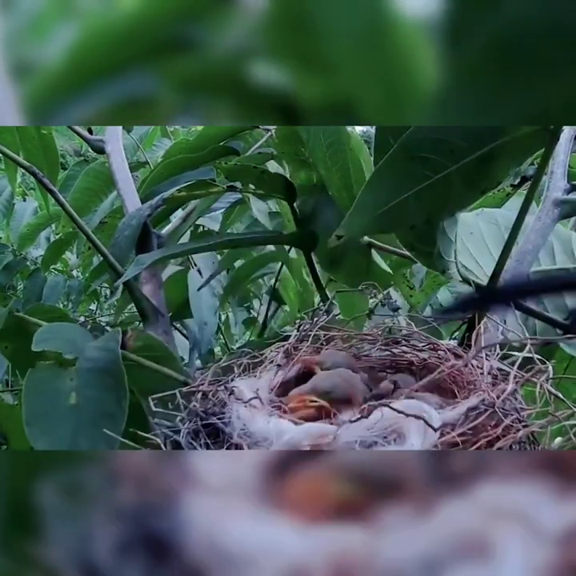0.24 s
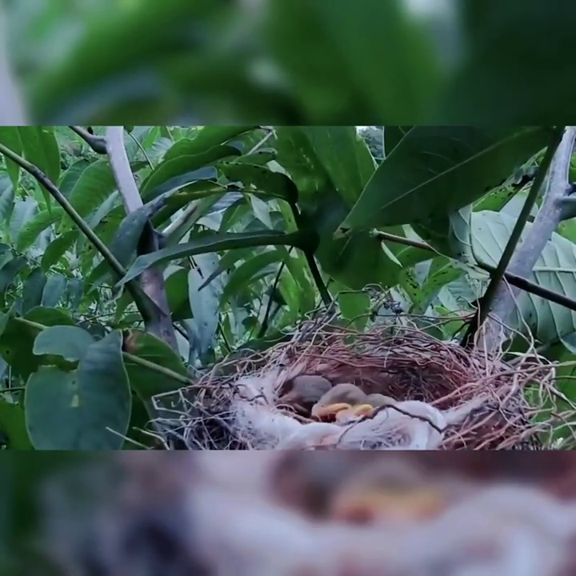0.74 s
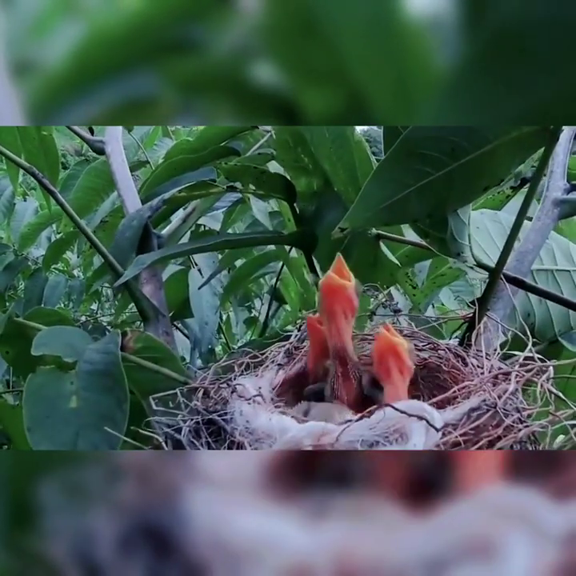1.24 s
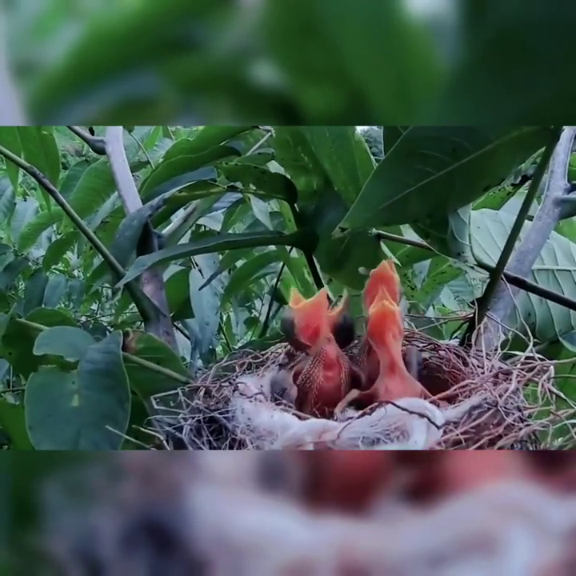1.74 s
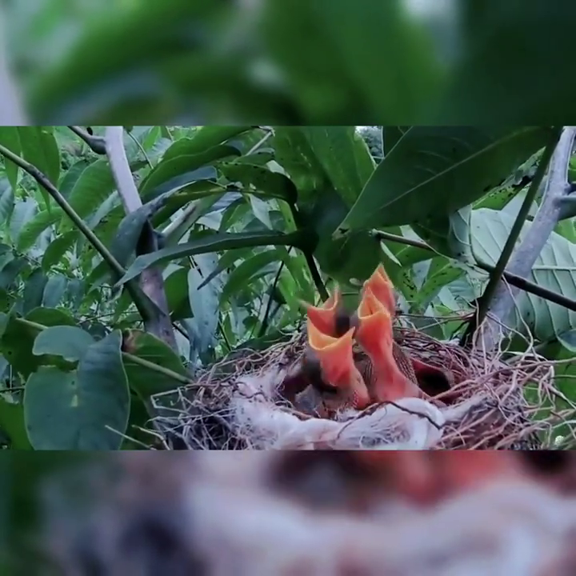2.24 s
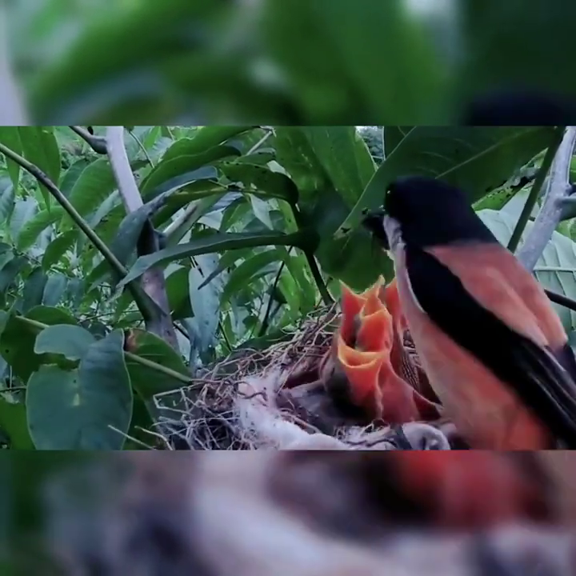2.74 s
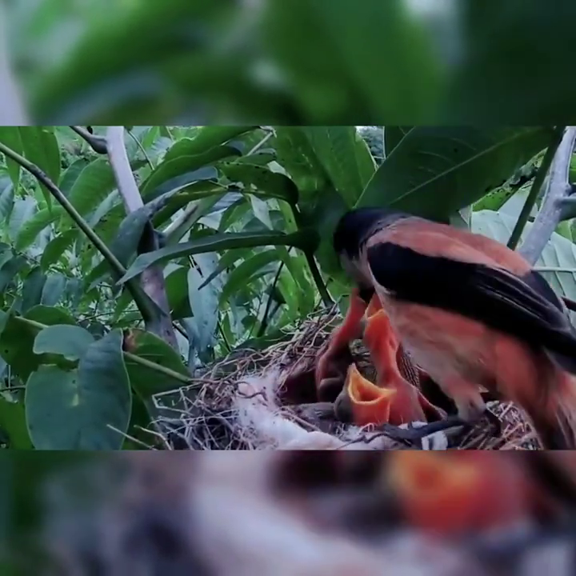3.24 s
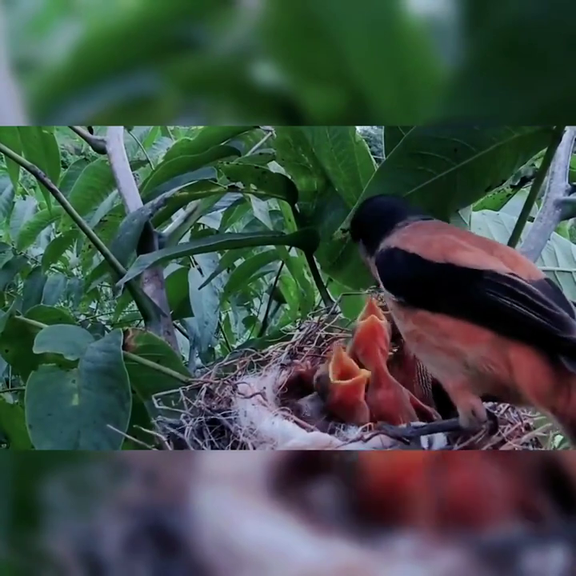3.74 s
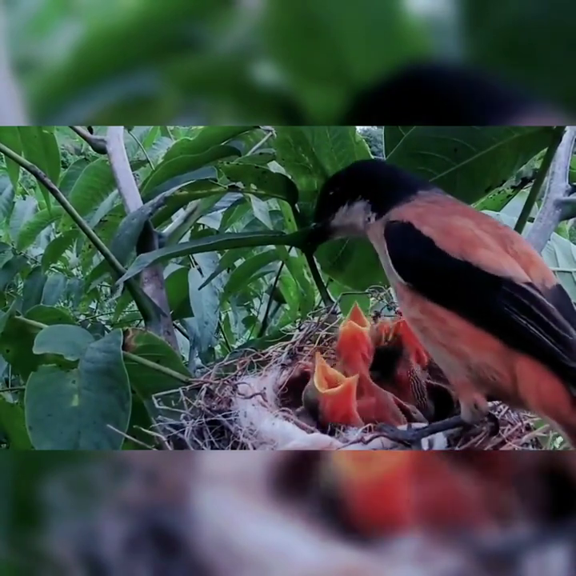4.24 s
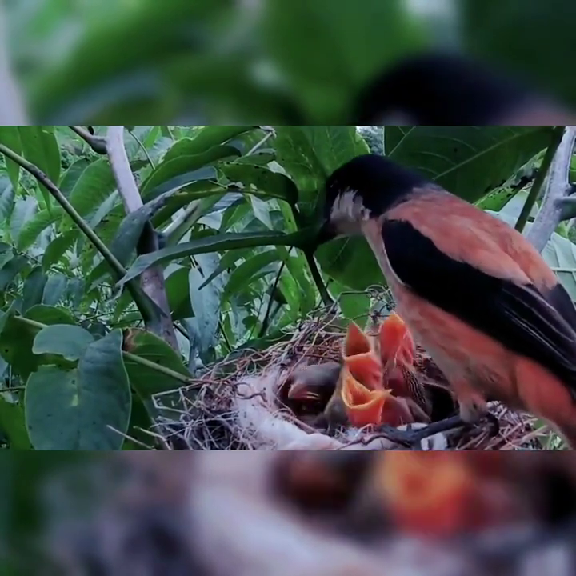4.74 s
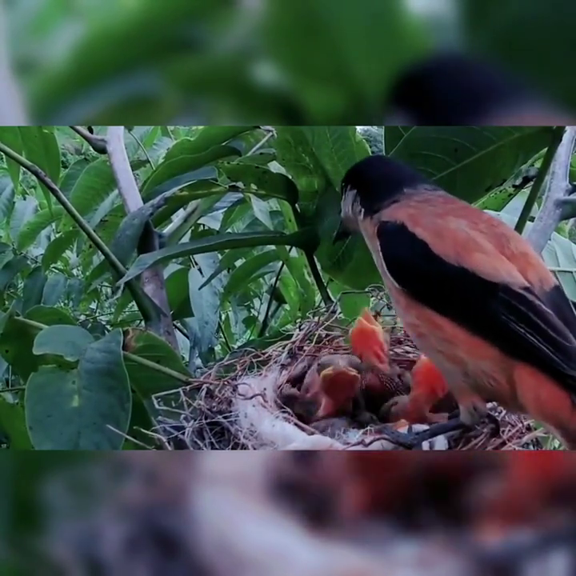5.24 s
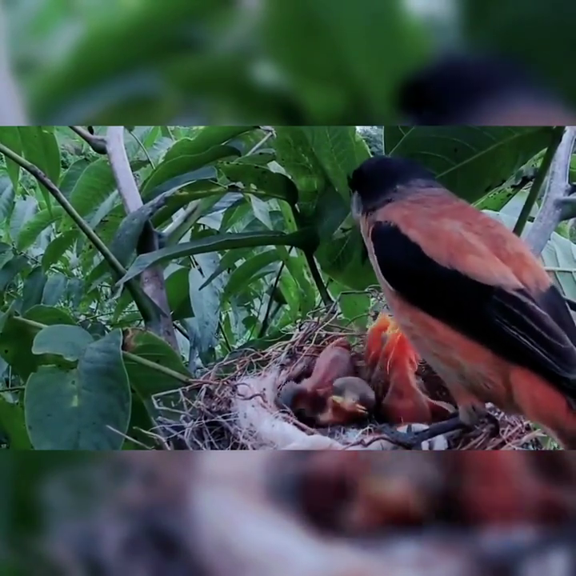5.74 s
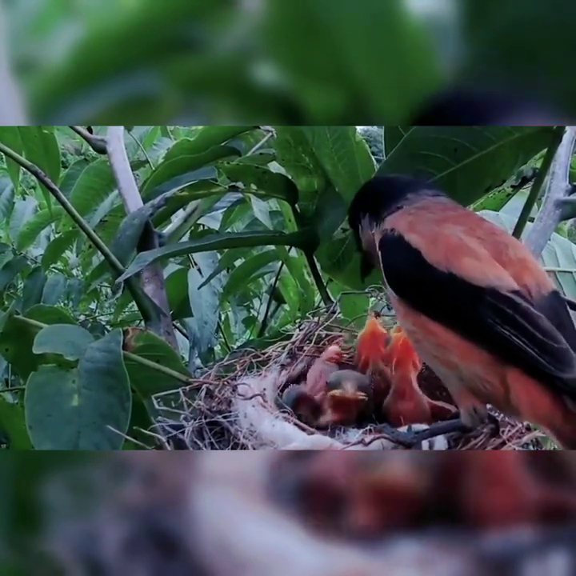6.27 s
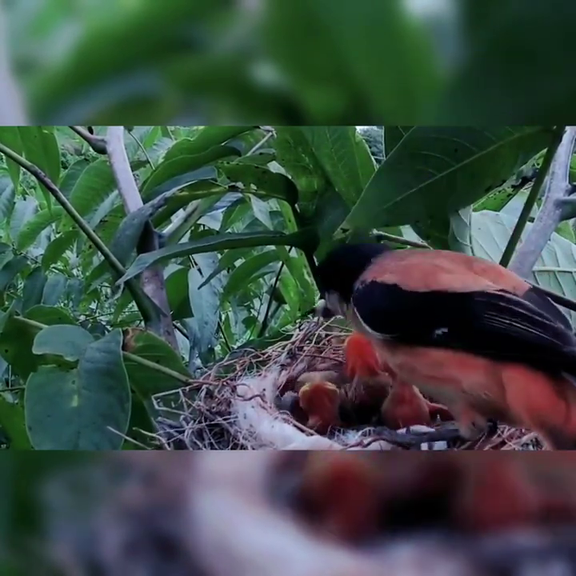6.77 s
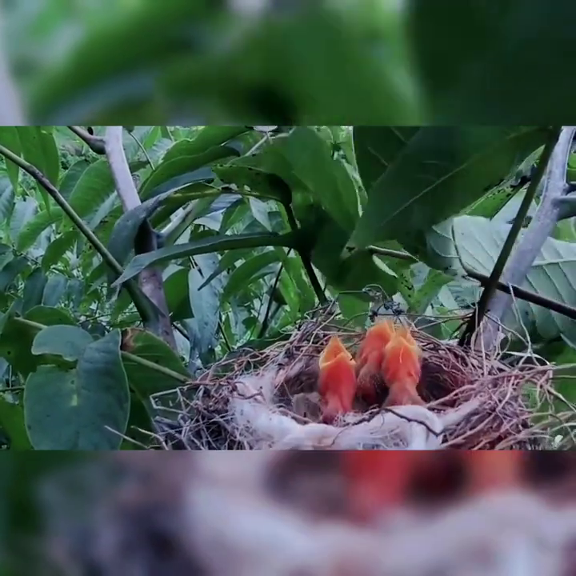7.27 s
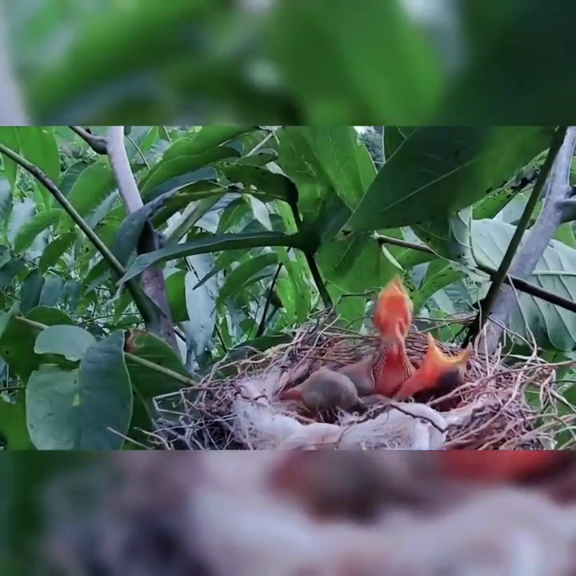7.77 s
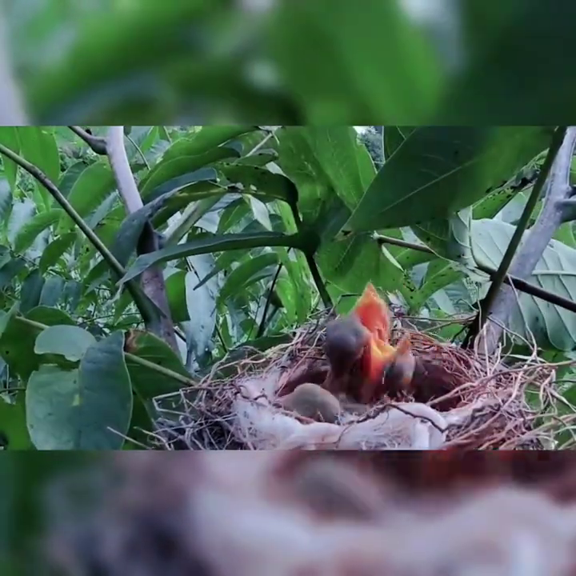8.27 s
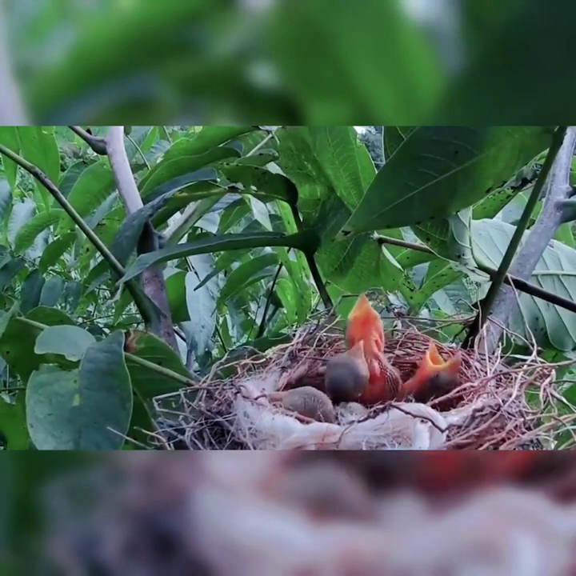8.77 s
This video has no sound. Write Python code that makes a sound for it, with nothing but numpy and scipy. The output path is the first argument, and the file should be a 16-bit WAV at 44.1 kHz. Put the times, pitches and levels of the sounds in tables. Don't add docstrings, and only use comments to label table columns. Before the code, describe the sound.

Four tiny birds beg with very high, short, unsteady whistles, mixed with lower chirps and squeaks. A parent clucks softly once or twice. Its landings and take-offs knock the wood, rattling the microphone mount and booming low, with gritty leaf and feather brushes. Behind lies an outdoor bed of soft hiss, insect droning and ticking, and faint rumble. Very close, dry, mono sound.

```python
import sys
import numpy as np
from scipy import signal
from scipy.fft import rfft, irfft
from scipy.io import wavfile
from scipy.ndimage import uniform_filter1d

SR = 44100
rng = np.random.default_rng(int(sys.argv[2]) if len(sys.argv) > 2 else 0)


def materialize(psi):
    bounded = np.clip(np.atleast_2d(psi).T, -1, 1)
    quanta = np.round(bounded * 32767).astype(np.int16)
    wavfile.write(sys.argv[1], SR, quanta)


def boost_factor(decibels):
    exponent = np.asarray(decibels, float) / 20
    return 10 ** exponent


N = 397341

# [top t/s, top f/Hz, length/s, level/dB]
SLIDER = [(0.013, 4580, 0.076, -41.5), (0.275, 5940, 0.059, -35), (0.557, 4200, 0.083, -36.5),
          (1.51, 6140, 0.072, -25), (1.572, 5010, 0.098, -39), (1.831, 7650, 0.053, -28.5),
          (2.094, 6820, 0.068, -26.5), (2.599, 7000, 0.037, -22), (2.826, 5960, 0.06, -24),
          (2.973, 5750, 0.11, -28.5), (3.043, 6880, 0.048, -27.5), (3.13, 6100, 0.097, -27.5),
          (3.133, 7150, 0.1, -33), (3.305, 7320, 0.17, -36.5), (3.356, 6740, 0.075, -30),
          (4.529, 7130, 0.069, -28), (4.937, 6170, 0.095, -29.5), (5.252, 6380, 0.04, -25),
          (5.433, 6740, 0.052, -29), (5.554, 7060, 0.084, -38), (5.628, 6350, 0.038, -28.5),
          (6.2, 6450, 0.085, -29.5), (6.423, 6370, 0.035, -25), (7.485, 6140, 0.023, -30.5),
          (7.701, 6600, 0.056, -23.5), (8.064, 5070, 0.064, -28), (8.446, 5420, 0.071, -28),
          (8.838, 7120, 0.1, -33.5), (8.828, 5240, 0.083, -30)]
# [top t/s, top f/Hz, length/s, level/dB]
LEANER = [(1.638, 5560, 0.056, -29.5), (2.347, 7450, 0.072, -32), (2.694, 5970, 0.067, -28),
          (2.731, 6970, 0.057, -29), (3.426, 6000, 0.031, -24.5), (3.648, 5490, 0.028, -26),
          (3.804, 6880, 0.043, -19.5), (3.841, 6800, 0.026, -29.5), (4.826, 6530, 0.063, -24),
          (5.151, 7470, 0.07, -36), (5.155, 6160, 0.084, -30), (5.567, 6180, 0.092, -32),
          (5.673, 5940, 0.032, -34), (5.75, 6530, 0.075, -32.5), (5.77, 7200, 0.054, -39),
          (5.835, 6400, 0.047, -21), (6.028, 6300, 0.031, -20.5), (6.319, 7630, 0.055, -34),
          (6.303, 7030, 0.071, -32), (6.63, 6150, 0.044, -29), (7.803, 4800, 0.055, -25.5),
          (7.855, 6990, 0.086, -26), (8.003, 5430, 0.088, -38), (8.144, 6750, 0.048, -21.5),
          (8.279, 6600, 0.061, -27.5), (8.281, 5450, 0.075, -36), (8.408, 6100, 0.064, -31),
          (8.565, 4770, 0.11, -32.5), (8.706, 5780, 0.041, -33), (8.72, 7120, 0.058, -29.5),
          (8.958, 4840, 0.099, -32)]
# [top t/s, top f/Hz, length/s, level/dB]
ARCHER = [(0.118, 7380, 0.063, -36.5), (0.206, 5580, 0.075, -33.5), (1.785, 5880, 0.055, -26),
          (2.308, 7180, 0.067, -25.5), (2.433, 6330, 0.062, -27), (2.468, 7020, 0.11, -26),
          (2.552, 6080, 0.048, -21), (2.973, 7150, 0.15, -33.5), (3.232, 7300, 0.04, -36),
          (3.5, 7790, 0.06, -30.5), (3.545, 7310, 0.065, -27), (3.959, 7170, 0.068, -23),
          (4.264, 7050, 0.032, -19), (4.437, 7380, 0.051, -27), (4.795, 7320, 0.045, -25),
          (4.864, 6900, 0.016, -28), (4.968, 5920, 0.063, -28), (5.091, 6560, 0.042, -26),
          (5.942, 6470, 0.046, -32), (5.988, 4290, 0.07, -35.5), (6.502, 6600, 0.039, -30.5),
          (6.77, 6370, 0.05, -38), (6.843, 6650, 0.045, -29.5), (7.283, 6370, 0.038, -31),
          (8.013, 6950, 0.059, -28.5), (8.149, 5040, 0.062, -32), (8.638, 7450, 0.08, -42),
          (8.781, 5530, 0.048, -30.5), (8.448, 4240, 0.087, -31), (8.586, 6630, 0.081, -27.5),
          (8.971, 7070, 0.055, -28)]
# [top t/s, top f/Hz, length/s, level/dB]
CLIMBER = [(0.25, 6460, 0.043, -40), (0.433, 6700, 0.034, -31.5), (1.305, 4750, 0.025, -31.5),
           (1.724, 6350, 0.063, -39), (1.81, 6950, 0.07, -27), (1.962, 7200, 0.054, -24),
           (2.058, 6300, 0.051, -30), (2.097, 8000, 0.056, -29), (2.247, 7770, 0.12, -32.5),
           (2.805, 7120, 0.031, -29), (3.653, 7350, 0.041, -22.5), (3.752, 7250, 0.072, -29.5),
           (3.93, 7000, 0.037, -27), (4.112, 7170, 0.043, -23), (4.333, 7250, 0.047, -29),
           (4.467, 6380, 0.04, -18.5), (4.633, 7460, 0.079, -29.5), (4.692, 6020, 0.11, -26.5),
           (4.766, 6980, 0.035, -26), (7.064, 6470, 0.046, -30), (7.125, 6270, 0.1, -35.5),
           (7.57, 6150, 0.044, -34), (7.726, 5450, 0.051, -36), (7.958, 6880, 0.037, -29),
           (8.384, 6800, 0.032, -30.5)]
RISE_SHARES = (.2, .33, .47, .67)
# [t/s, length/s, middle f/Hz, slide/Hz, level/dB]
BOWED = [(0.064, 0.027, 5700, 1500, -25.5), (1.241, 0.03, 4680, 350, -36), (1.29, 0.11, 5600, 420, -38.5),
         (1.369, 0.043, 4970, 145, -32), (2.032, 0.037, 5600, 103, -24), (2.806, 0.035, 7250, -320, -33),
         (2.872, 0.037, 6740, 250, -28), (3.355, 0.03, 6090, -220, -28), (3.496, 0.024, 6670, 1900, -23),
         (3.784, 0.045, 6620, 158, -26), (4.132, 0.083, 6280, -380, -29), (4.133, 0.075, 5780, -400, -32.5),
         (4.671, 0.043, 7640, 0, -23.5), (4.674, 0.041, 6700, 0, -22), (4.772, 0.045, 6250, -200, -27),
         (5.118, 0.051, 4130, -300, -27), (5.124, 0.026, 3140, -400, -29), (5.296, 0.06, 4477, 302, -18),
         (5.347, .022, 4573, -100, -17), (5.354, 0.03, 3370, 98, -22.5), (5.483, 0.018, 3540, 1002, -24.5),
         (5.718, 0.016, 4040, 212, -27.5), (5.962, 0.045, 5050, 100, -37), (6.199, 0.019, 6420, -130, -18),
         (6.839, 0.048, 5230, -500, -35), (7.852, 0.062, 3870, -250, -28), (7.682, 0.069, 4430, -900, -36),
         (8.136, 0.023, 5600, 0, -40), (8.538, 0.025, 6450, 504, -28)]
# [t/s, length/s, middle f/Hz, slide/Hz, level/dB]
STRAIGHT = [(1.686, 0.022, 7440, 200, -29.5), (1.71, 0.027, 7070, -620, -31),
            (1.904, 0.033, 5340, 300, -31), (2.334, 0.011, 3380, 4, -23.5), (2.673, 0.035, 6000, -88, -23),
            (2.82, 0.011, 5950, -51, -15), (3.188, 0.015, 6810, -180, -21.5),
            (3.33, 0.042, 6950, -400, -26.5), (2.867, 0.012, 3340, 0, -24), (3.631, 0.021, 3240, -10, -28),
            (3.667, 0.026, 6150, -1100, -31.5), (4.28, 0.03, 7200, -1000, -32),
            (4.264, 0.018, 5700, 0, -20.5), (4.447, 0.02, 5940, -20, -19.5), (4.335, 0.1, 5670, -700, -34),
            (4.395, 0.025, 3770, 200, -31), (4.612, 0.055, 5610, 810, -27), (4.821, 0.07, 5050, 30, -30),
            (5.144, 0.035, 3370, 998, -20.5), (5.286, 0.013, 3520, 1400, -20.5),
            (5.36, 0.01, 4000, -1100, -17), (5.626, 0.017, 6340, -8, -19), (5.719, 0.024, 3700, 272, -29),
            (6.312, 0.032, 5800, 400, -31), (6.736, 0.086, 4960, 80, -37), (6.916, 0.03, 4280, -300, -32.5),
            (7.786, 0.03, 5500, -40, -31), (7.87, 0.024, 6800, -550, -27), (8.44, 0.034, 4740, -420, -30)]
# [t/s, length/s, middle f/Hz, slide/Hz, level/dB]
DIPPED = [(0.003, 0.053, 5500, -580, -26), (0.127, 0.023, 4850, -2200, -29.5),
          (1.605, 0.081, 3290, -440, -30.5), (1.653, 0.034, 6000, 0, -27), (2.169, 0.02, 5400, 0, -23),
          (2.303, 0.095, 5350, 47, -36), (3.166, 0.033, 6520, -40, -38), (3.306, 0.038, 5910, -490, -16.5),
          (3.374, 0.03, 5400, -390, -24), (3.543, 0.083, 5940, -100, -40), (3.573, 0.065, 6480, 200, -34),
          (4.487, 0.0055, 3210, 0, -17), (4.683, 0.033, 5040, 202, -30), (4.957, 0.058, 3370, 30, -30),
          (5.03, 0.018, 3400, 124, -25.5), (5.099, 0.023, 2926, 600, -15.5),
          (5.504, 0.026, 3874, 110, -17.5), (5.559, 0.011, 3310, 52, -21), (5.699, 0.016, 3210, 662, -12.5),
          (5.902, 0.033, 3790, 140, -29.5), (6.012, 0.014, 2960, -80, -8.5),
          (6.223, 0.055, 3430, 200, -31.5), (6.767, 0.092, 3350, -55, -33.5), (7.029, 0.12, 3500, 90, -31),
          (7.076, 0.085, 4580, 250, -35), (7.551, 0.042, 3530, -230, -31), (7.846, 0.051, 4470, -390, -34),
          (7.859, 0.043, 5350, -400, -36), (8.313, 0.03, 4550, 60, -32.5)]
BOWS_HZ = (-240, -36, 181)
# [t/s, length/s, f/Hz, peak level/dB]
CHIRPS = [(0.142, 0.0071, 3930, -27.5), (0.308, 0.011, 3580, -25), (0.18, 0.047, 3900, -34.5),
          (1.554, 0.012, 3370, -25.5), (1.954, 0.0099, 3410, -24.5), (2.074, 0.011, 3400, -23),
          (2.222, 0.017, 3330, -27), (2.583, 0.017, 3595, -27), (2.651, 0.017, 3320, -26.5),
          (3.033, 0.0093, 3410, -28.5), (4.708, 0.0093, 3450, -31), (3.196, 0.012, 3350, -25),
          (4.824, 0.0085, 3820, -24.5), (5.677, 0.0098, 3460, -26), (6.876, 0.018, 3520, -28),
          (7.023, 0.0062, 3990, -28.5), (7.998, 0.018, 3970, -32.5), (8.27, 0.031, 3890, -34),
          (8.954, 0.0058, 3410, -27)]
# [t/s, length/s, lowest f/Hz, peak level/dB]
SQUEAKS = [
    (5.94, 0.019, 3210, -21),
    (6.735, 0.015, 3185, -22.5),
]
# [t/s, length/s, middle f/Hz, peak level/dB]
SAGS = [
    (0.057, 0.04, 3760, -27.5),
    (0.485, 0.023, 3760, -30),
    (1.321, 0.11, 3760, -35.5),
]
# [t/s, length/s, f/Hz, peak level/dB]
PIPES = [
    (0.854, 0.124, 2600, -45.5),
    (8.18, 0.037, 3300, -35.5),
    (6.47, 0.15, 3550, -35.5),
    (5.8, 0.132, 3480, -44),
    (7.556, 0.19, 3700, -44),
]
# [t/s, peak level/dB, f/Hz]
CLUCKS = [
    (4.091, -23, 1505),
    (4.104, -26.5, 1440),
    (4.9104, -31, 1430),
]
# [t/s, peak level/dB, ring f/Hz]
KNOCKS = [(0.226, -15, 129), (0.253, -1.5, 162.4), (0.299, -7, 194), (1.025, 3.5, 216.3),
          (2.086, -13.5, 172), (2.157, 0, 154), (2.205, -5.5, 180), (2.229, -0.5, 137.5), (2.257, -6, 223),
          (2.536, -17.5, 215), (2.657, -7.5, 200.4), (2.686, -17.5, 215), (1.286, -25.5, 189),
          (7.549, -23.5, 150), (7.576, -31, 151), (7.237, 0, 166), (7.307, -7.5, 102), (7.333, -8, 178.8),
          (8.955, -17.5, 162)]
# [f/Hz, level/dB, t60/s]
RATTLE = [
    (669, 9, 0.051),
    (1146, 4.5, 0.058),
    (1710, -3, 0.036),
    (3240, 8.5, 0.016),
]
# [peak t/s, level/dB, rise/s, fall/s, f/Hz]
SWAYS = [(0.364, -9.5, 0.074, 0.053, 35), (0.599, -30.5, 0.3, 0.067, 36.2), (1.093, -1.5, 0.054, 0.1, 37.5),
         (2.128, -19, 0.041, 0.17, 36), (2.223, -16.5, 0.058, 0.047, 35.7), (2.608, -6, 0.011, 0.012, 42.2),
         (2.7, -23, 0.22, 0.047, 34.8), (7.346, -10, 0.085, 0.11, 36.6), (1.55, -40.5, 0.15, 0.11, 38.7),
         (3.75, -41, 0.27, 0.061, 37), (5.301, -41.5, 0.12, 0.075, 37.7), (8.1, -50, 0.11, 0.085, 37.5),
         (8.8, -44.5, 0.087, 0.12, 44.5)]
# [t/s, level/dB, half length/s, bright against dull/dB]
RUSTLES = [(0.224, -36, 0.0033, -21.5), (0.275, -38, 0.0038, -16), (0.336, -23, 0.017, -5),
           (0.357, -31, 0.0066, 13), (0.46, -39.5, 0.017, 9.5), (0.44, -36.5, 0.29, -3),
           (1.106, -35, 0.083, -18), (2.06, -33.5, 0.05, -24), (2.088, -23.5, 0.013, -24),
           (2.16, -13.5, 0.0064, -26), (2.194, -22.5, 0.016, -15), (2.23, -20.5, 0.0084, -18),
           (2.259, -21.5, 0.025, -24), (2.54, -19.5, 0.013, -15), (2.637, -27.5, 0.0059, 3.5),
           (2.667, -22, 0.013, -12), (2.727, -34.5, 0.018, -4), (7.237, -30.5, 0.0058, -3),
           (7.306, -28, 0.0094, 1), (7.309, -33.5, 0.068, -1), (7.33, -45, 0.0034, -6),
           (7.402, -44.5, 0.014, 6), (7.515, -40, 0.01, 10), (8.969, -26.5, 0.015, -10.5)]
# [f/Hz, level/dB per Hz]
LEAVES = [(300, 9.5), (1200, 11.5), (2300, -4.5), (3400, 3.5), (5000, -0.5), (8000, -56)]
# [f/Hz, level/dB per Hz]
TWIGS = [(1500, -9.5), (3400, -1.5), (7900, -9), (8500, -19.5), (15300, -36.5)]
# [t/s, rumble level/dB, drone level/dB, hiss gain/dB]
AROUND = [
    (0, -45, -41.5, -6),
    (1.1, -43, -37.5, 1.6),
    (3.6, -46, -41, 1.5),
    (5.2, -52.5, -42.5, -2),
    (7.6, -47, -44.5, -1),
    (7.75, -53.5, -60, 0),
    (9.01, -52, -78, -1.5),
]
# [f/Hz, level/dB per Hz]
FOREST = [(35, -42), (60, -52), (159, 0.5), (509, -14.5), (800, -9.5), (1400, -15), (2650, -16), (3300, -5),
          (4220, -10.5), (7800, -14), (8400, -24.5), (13500, -42), (15500, -89)]


def nestlings():
    rows = [(*row, share)
            for table, share in zip((SLIDER, LEANER, ARCHER, CLIMBER), RISE_SHARES) for row in table]
    arches = [arch(*row) for row in rows] + answers(rows + rows[::2])
    strands = [strand(*row, bow_hz)
               for table, bow_hz in zip((BOWED, STRAIGHT, DIPPED), BOWS_HZ) for row in table]
    bends = (CHIRPS, (-300, -300)), (SQUEAKS, (405, 576)), (SAGS, (448, -400)), (PIPES, (80, -80))
    chirps = [bend(row, ends_hz, leg_s=0.007, leg_hz=318, leg_db=-2.0)
              for table, ends_hz in bends for row in table]
    high = sing(arches, wobble_hz=65, flutter_db=6.5, side_db=-14, overtone_db=-41, breath_db=-20)
    high = high + sing(strands, wobble_hz=45, flutter_db=3.0, side_db=-30, overtone_db=-42, breath_db=-24)
    high = signal.sosfilt(signal.butter(8, 2750, "high", fs=SR, output="sos"), high)
    return high + sing(chirps, wobble_hz=30.4, flutter_db=2.5, side_db=-37.5, overtone_db=-44, breath_db=-31)


def arch(s, top_hz, length_s, level_db, share):
    rise_s, fall_s = share * length_s, (1 - share) * length_s
    t = np.arange(-1.22 * rise_s, 1.22 * fall_s, 1 / SR)
    out = np.abs(t / np.where(t < 0, rise_s, fall_s))
    hz = top_hz - 1918 * out ** 2.4
    fade = np.clip((1.22 - out) / .3, 0, 1) * np.clip((hz - 2700) / 300, 0, 1)
    foot_db = 8.0 * np.exp(-((hz - 3400) / 450) ** 2)
    return round((s + t[0]) * SR), hz, boost_factor(level_db - 14 * out ** 2 + foot_db) * fade


def answers(rows):
    calls = []
    for (s, top_hz, length_s, level_db, _), (x, y, z) in zip(rows, rng.random((len(rows), 3))):
        late_s, far_db = .09 * (x - .3), .5 * level_db - 24 - 7 * z
        calls.append(arch(s + late_s, top_hz * (.74 + .3 * y), length_s, far_db, .3))
    return calls


def strand(s, length_s, middle_hz, slide_hz, level_db, bow_hz):
    u = np.linspace(-1.2, 1.2, round(1.2 * length_s * SR))
    hz = middle_hz + slide_hz * u / 2 + bow_hz * u ** 2
    return round((s - 0.11 * length_s) * SR), hz, boost_factor(level_db) * np.hanning(len(u)) ** 0.27


def bend(row, ends_hz, leg_s, leg_hz, leg_db):
    s, length_s, middle_hz, level_db = row
    t = np.arange(-leg_s, length_s + leg_s, 1 / SR)
    u = np.clip(t / length_s, 0, 1)
    out = np.abs(t - u * length_s) / leg_s
    bow_hz = np.where(u < .5, *ends_hz) * (2 * u - 1) ** 2
    shape = np.sin(np.pi * u) ** 0.18 + boost_factor(leg_db) * np.cos(np.pi / 2 * np.clip(out, 0, 1))
    return round((s - leg_s) * SR), middle_hz + bow_hz - leg_hz * out ** 2.7, boost_factor(level_db) * shape


def sing(calls, wobble_hz, flutter_db, side_db, overtone_db, breath_db):
    tone, effort = np.zeros(N), np.zeros(N)
    wobble = .6 * drift(200) + 1.4 * drift(35)
    flutter = np.clip(drift(70), -3, 1.3)
    for (i, hz, shape), chance in zip(calls, rng.random((len(calls), 5))):
        at = i + np.arange(len(hz))
        own = (at + int(chance[3] * N)) % N
        strain = 1.6 if 2.7 * SR < i < 7.2 * SR else .7
        pitch_hz = np.clip(hz, 2300, 9000) + strain * wobble_hz * wobble[own]
        phase = 2 * np.pi * np.cumsum(pitch_hz) / SR
        spacing = (0.097 + 0.11 * chance[0]) * phase
        sides = 0
        for n, k in ((1, 1), (2, 2), (3, 4)):
            sides = sides + chance[k] * boost_factor(flutter_db * flutter[own - k * SR]) * np.sin(phase - n * spacing)
        voice = boost_factor(flutter_db * flutter[own]) * (np.sin(phase) + boost_factor(overtone_db) * np.sin(2 * phase))
        inside = (at >= 0) & (at < N)
        tone[at[inside]] += (shape * (voice + boost_factor(side_db) * sides))[inside]
        effort[at[inside]] += shape[inside]
    breath = uniform_filter1d(effort, size=900) * band(rng.standard_normal(N), 2500, 7360)
    return tone + boost_factor(breath_db) * breath


def clucks():
    out, t = np.zeros(N), np.arange(round(0.0073 * SR)) / SR
    shape = np.hanning(len(t)) ** 0.12
    for s, level_db, hz in CLUCKS:
        phase = 2 * np.pi * hz * (t - 2.8 * t ** 2)
        add(out, s, boost_factor(level_db) * shape * (np.sin(phase) + np.sin(2 * phase)))
    return out


def foliage(x, t60_s, level_db):
    t = np.arange(round(t60_s * SR)) / SR
    tail = rng.standard_normal(len(t)) * boost_factor(-60 * t / t60_s) * (t > .003)
    return x + boost_factor(level_db) * signal.fftconvolve(x, tail / np.linalg.norm(tail))[:N]


def knocks():
    out, rows = np.zeros(N), np.array(KNOCKS)
    t = np.arange(SR // 4) / SR
    for s, level_db, hz in KNOCKS:
        phase = 2 * np.pi * hz * (t + 0.0026 * (1 - np.exp(-t / 0.0019)))
        add(out, s, boost_factor(level_db - 60 * t / 0.15) * (1 - np.exp(-t / 0.0012)) * np.sin(phase))
    blows = np.zeros(N)
    blows[(rows[:, 0] * SR).astype(int)] = boost_factor(rows[:, 1] - 41)
    press = np.concatenate([np.hanning(24)[:12], np.geomspace(1, .03, 500)])
    contact = np.convolve(blows, press)[:N]
    for hz, level_db, t60_s in RATTLE:
        out += boost_factor(level_db) * ring(contact * rng.standard_normal(N), hz, t60_s)
    return out


def shakes():
    t = np.arange(N) / SR
    creak = coloured([(40, 7.0), (70, 6.5), (260, -4.0), (700, -31), (9000, -125)])
    sway, dull, bright = np.zeros(N), np.zeros(N), np.zeros(N)
    for s, level_db, rise_s, fall_s, hz in SWAYS:
        swing = boost_factor(level_db) * np.sqrt(2) * np.cos(2 * np.pi * hz * (t - s))
        sway += swell(s, rise_s, fall_s) * (swing + boost_factor(-7.5 + 0.73 * level_db) * creak)
    for s, level_db, half_s, bright_db in RUSTLES:
        dull += boost_factor(level_db) * swell(s, 1.13 * half_s, half_s)
        bright += boost_factor(level_db + bright_db) * swell(s, 1.1 * half_s, half_s)
    grain = boost_factor(3 * np.clip(drift(150), -3, 2))
    return sway + grain * (dull * coloured(LEAVES) + bright * coloured(TWIGS))


def forest(rumble_db, drone_db, hiss_db):
    hiss = boost_factor(-39.5 + hiss_db + 1.8 * drift(8)) * coloured(FOREST)
    rumble = boost_factor(rumble_db + 5.7 * drift(26)) * coloured([(15, 12.5), (35, 10.5), (90, 4.0), (250, -42.5)])
    drone = boost_factor(drone_db + 4.17 * drift(13.0)) * band(rng.standard_normal(N), 113.0, 223.0)
    stridulation = boost_factor(-45.5 + 5 * drift(28)) * band(rng.standard_normal(N), 3300, 3620)
    beat_hz = 48 + 3 * drift(3.4)
    beat = np.diff(np.floor(np.cumsum(beat_hz) / SR), prepend=0)
    burst = np.convolve(beat * boost_factor(3 * drift(30)), np.hanning(220), "same")
    ticks = boost_factor(-44.5 + 2 * drift(1)) * burst * band(rng.standard_normal(N), 6500, 7500)
    return hiss + rumble + drone + stridulation + ticks


def rms_one(x):
    return x / np.sqrt(np.mean(x ** 2) + 1e-20)


def in_time(rows):
    s, *columns = np.transpose(rows)
    return [np.interp(np.arange(N) / SR, s, column, -120, -120) for column in columns]


def drift(rate_hz):
    r = np.exp(-2 * np.pi * rate_hz / SR)
    return rms_one(signal.lfilter([1], [1, -2 * r, r * r], rng.standard_normal(N + SR))[SR:])


def coloured(points):
    hz, level_db = np.transpose(points)
    at = np.log(np.fft.rfftfreq(N, 1 / SR) + 1)
    shape_db = np.interp(at, np.log(hz), level_db)
    return rms_one(irfft(rfft(rng.standard_normal(N)) * boost_factor(shape_db), N))


def band(x, low_hz, high_hz):
    return rms_one(signal.sosfilt(signal.butter(4, [low_hz, high_hz], "band", fs=SR, output="sos"), x))


def ring(clicks, hz, t60_s):
    r, w = boost_factor(-60 / (t60_s * SR)), 2 * np.pi * hz / SR
    return signal.lfilter([0, np.sin(w)], [1, -2 * r * np.cos(w), r * r], clicks + 1e-18)


def swell(s, rise_s, fall_s):
    t = np.arange(N) / SR - s
    return np.exp(-(t / np.where(t < 0, rise_s, fall_s)) ** 2)


def add(out, s, sound):
    i = max(round(s * SR), 0)
    out[i:i + len(sound)] += sound[:max(N - i, 0)]


def scene():
    voices = foliage(nestlings() + clucks(), t60_s=0.2, level_db=-10.0)
    return (voices + knocks() + shakes() + forest(*in_time(AROUND)))[None]


def top_cut(x):
    return signal.sosfilt(signal.butter(12, 15700, fs=SR, output="sos"), x)


def record(dry):
    climb_db = 40 * np.arange(N) / SR
    over_db = np.maximum(20 * np.log10(np.abs(dry) + 1e-9) + 2, 0)
    duck_db = np.maximum.accumulate(over_db + climb_db, axis=1) - climb_db
    x = dry * boost_factor(-uniform_filter1d(duck_db, size=600))
    x = 1.21 * x / (1 + (1.2 * x) ** 4) ** .25
    x = signal.sosfilt(signal.cheby2(10, 50, 15600, fs=SR, output="sos"), x)
    return top_cut(x)


dry = scene()
out = record(dry)
materialize(out)
```